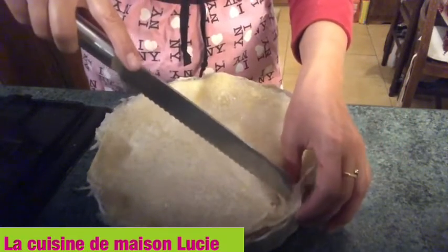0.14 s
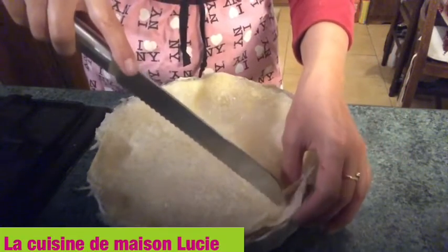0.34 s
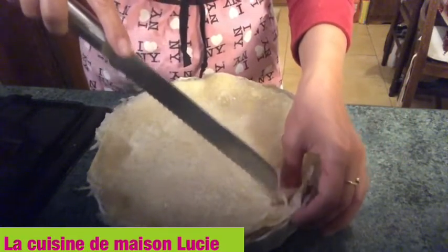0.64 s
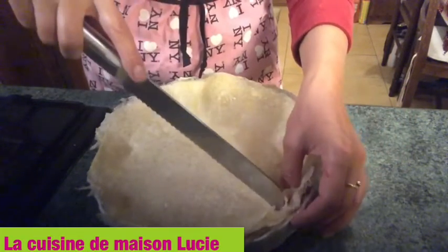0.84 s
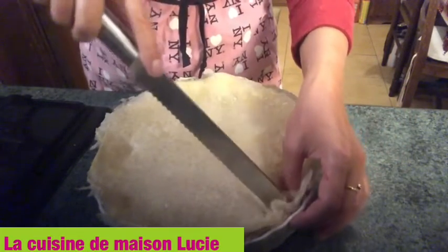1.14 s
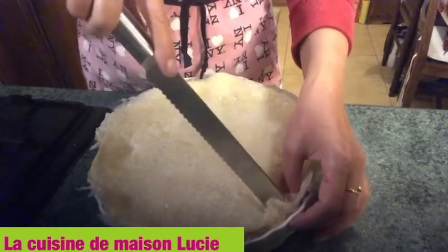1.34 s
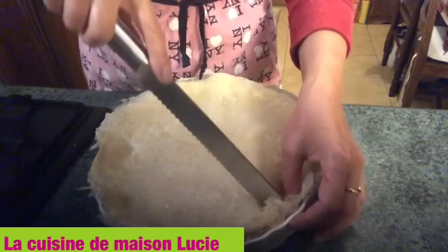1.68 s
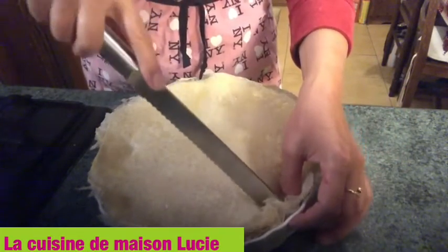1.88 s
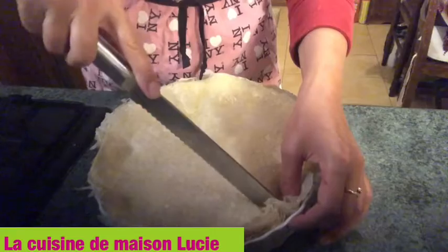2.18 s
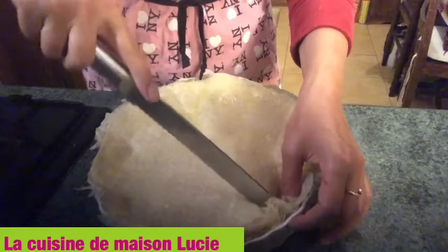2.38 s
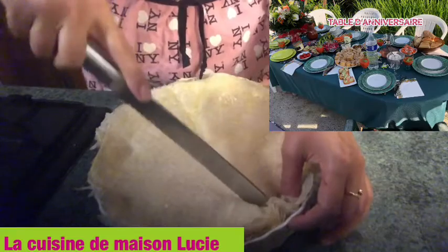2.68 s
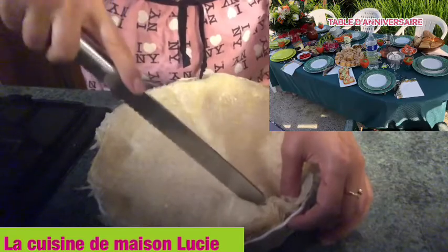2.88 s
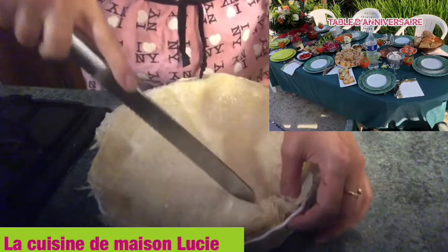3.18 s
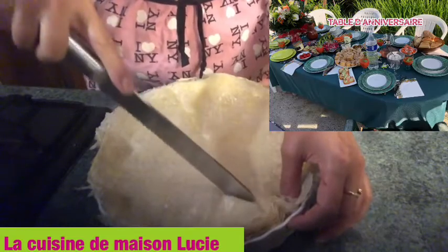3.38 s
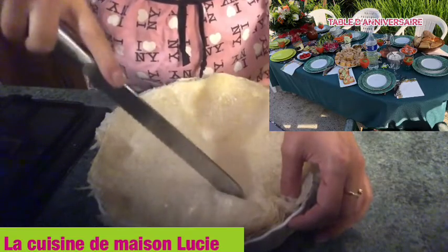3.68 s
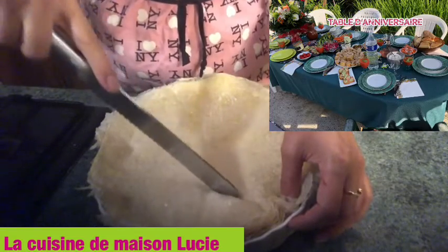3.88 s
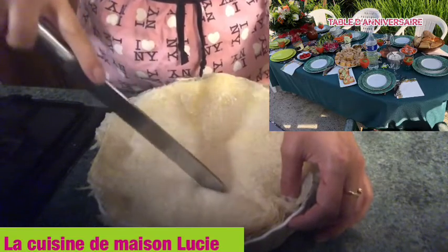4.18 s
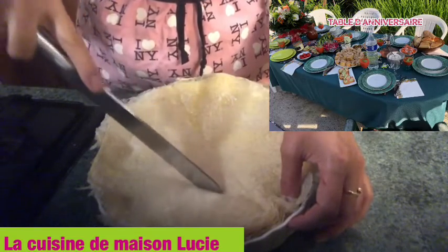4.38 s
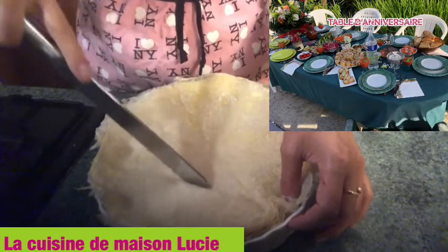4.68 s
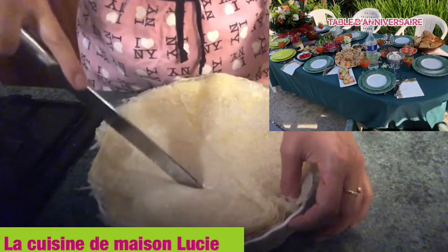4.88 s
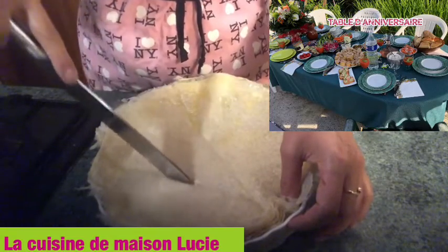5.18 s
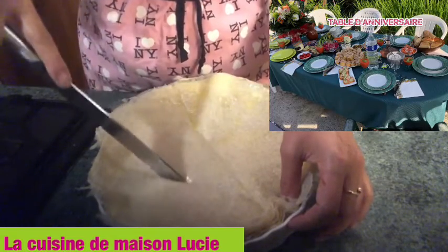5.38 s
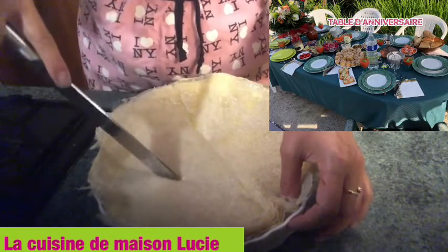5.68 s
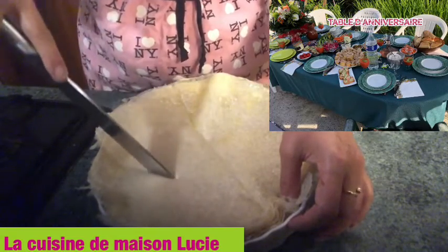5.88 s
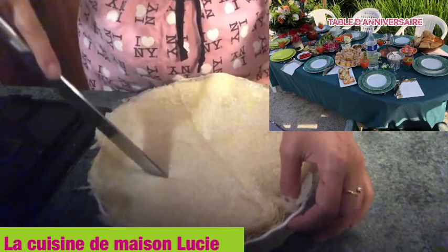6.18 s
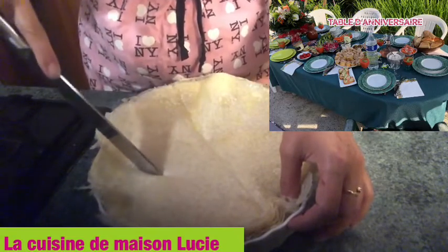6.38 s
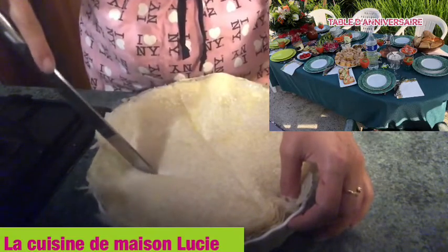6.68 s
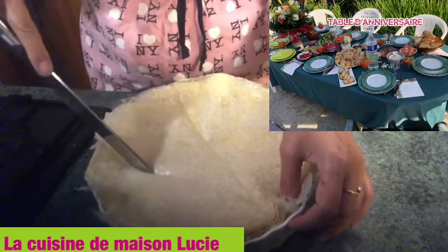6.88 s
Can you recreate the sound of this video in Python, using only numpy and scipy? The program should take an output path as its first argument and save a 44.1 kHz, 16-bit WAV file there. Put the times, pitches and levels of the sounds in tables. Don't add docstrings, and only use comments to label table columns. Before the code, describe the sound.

Close to a small microphone in a hard-walled kitchen, a blade tip works steadily through flaky pastry on a metal tray. Hum and hiss come first, alone; then crisp rustles, tiny flake snaps, wooden-sounding thuds and short ringing clacks repeat in a regular rhythm. The pace loosens after five seconds, with muffled hand bumps filling the gaps before three final, brighter jabs. The room echo is short.

```python
import sys
import numpy as np
from scipy import signal
from scipy.fft import rfft, irfft
from scipy.io import wavfile
from scipy.ndimage import uniform_filter1d

SR = 44100
rng = np.random.default_rng(int(sys.argv[2]) if len(sys.argv) > 2 else 0)


def waveform_to_disk(signal):
    frames = np.transpose(np.atleast_2d(signal))
    scaled = np.clip(frames, -1, 1) * 32767
    samples = np.round(scaled).astype(np.int16)
    wavfile.write(sys.argv[1], SR, samples)


def gain_from_db(level_db):
    decades = np.asarray(level_db, float) / 20
    return 10 ** decades


N = 310464


def along(table, hz):
    points_hz, values = np.array(table).T
    return np.interp(np.log(np.maximum(hz, 1)), np.log(points_hz), values)


def colour(x, table):
    gain = gain_from_db(along(table, np.fft.rfftfreq(len(x), 1 / SR)))
    y = irfft(rfft(x) * gain, len(x))
    return y / np.std(y)


def walk(rate_hz):
    hold = int(SR / rate_hz)
    steps = rng.standard_normal(N // hold + 1)
    return uniform_filter1d(np.repeat(steps, hold), hold)[:N]


def add(out, s, piece):
    i = int(s * SR)
    out[i:i + len(piece)] += piece[:len(out) - i]


def ring(t, hz, rise_s, t60, phase):
    t = np.maximum(t, 0)
    envelope = (1 - np.exp(-t / rise_s)) * np.exp(-np.log(1000) * t / t60)
    return envelope * np.sin(2 * np.pi * hz * t + phase)


def pulse(t, scale_s, peak_s):
    return t / scale_s * np.exp(1 - t / peak_s)


# f/Hz, level/dB
HUM_LINES = [(102.3, -71), (145.3, -77), (247.6, -74), (296.1, -81), (344.5, -74), (436, -88.5),
             (592.2, -88.5), (640.6, -89)]
# f/Hz, level/dB per Hz
AIR_SPECTRUM = [(15, -47), (32, -21), (48, -9), (64, -7.5), (92, -11.5), (195, -8.5), (249, -3.5),
                (293, -11.5), (344, -7), (394, -15.5), (476, -15), (1040, -20), (2160, -25.5), (3080, -26),
                (14800, -34.5), (16000, -38)]
AIR_DB = -63
EASE_S, HISS_EASE_DB, MIDDLE_EASE_DB = 0.92, -2.5, -0.5


def kitchen():
    t = np.arange(N) / SR
    hum = 0
    for hz, db in HUM_LINES:
        level = gain_from_db(db + 4.0 + 0.73 * walk(1.4))
        wander = 0.81 * np.cumsum(walk(4)) * 12 / SR
        hum = hum + level * np.sin(2 * np.pi * hz * t + wander)
    air = gain_from_db(AIR_DB - 5.0 + 0.417 * walk(2.9)) * colour(rng.standard_normal(N), AIR_SPECTRUM)
    hiss = signal.sosfilt(signal.butter(6, 8200, "high", fs=SR, output="sos"), air[::-1])
    dull = signal.sosfilt(signal.butter(6, 8200, fs=SR, output="sos"), air)
    middle = signal.sosfilt(signal.butter(2, 450, "high", fs=SR, output="sos"), dull)
    early = t < EASE_S
    middle_change = middle * np.where(early, 0, gain_from_db(MIDDLE_EASE_DB) - 1)
    return hum + dull + middle_change + hiss * np.where(early, 1, gain_from_db(HISS_EASE_DB))


# f/Hz, T60/s
ROOM_DECAY = [(80, 0.61), (200, 0.16), (600, 0.36), (1500, 0.19), (4000, 0.043), (10000, 0.06)]


def room(x, first_s=0.0054):
    t, tail = np.arange(int(0.6 * SR)) / SR, 0
    for hz in 60 * 2 ** np.arange(0, 8, 0.5):
        band = signal.butter(2, [hz / 2 ** 0.25, hz * 2 ** 0.25], "band", fs=SR, output="sos")
        echoes = signal.sosfilt(band, rng.standard_normal(len(t)))
        tail = tail + echoes * np.exp(-np.log(1000) * t / along(ROOM_DECAY, hz))
    tail = tail * np.clip(t / first_s, 0, 1) ** 2
    return signal.fftconvolve(x, tail / np.sqrt(np.sum(tail ** 2)))[:N]


# t/s, length/s, level/dB, f/Hz
HAND_BUMPS = [
    (5.295, 0.039, -56.5, 175),
    (5.86, 0.0085, -57.5, 230),
    (1.195, 0.04, -63, 285),
    (6.056, 0.018, -57, 161),
    (6.093, 0.02, -57, 177),
    (6.319, 0.041, -59, 242),
]


def hand_bumps():
    length = int(0.3 * SR)
    out, t = np.zeros(N), np.arange(length) / SR
    for s, length_s, db, hz in HAND_BUMPS:
        muffled = [(hz / 2.5, -20), (hz, 0), (hz * 1.5, -6), (600, -28), (2000, -45), (8000, -70)]
        dull = colour(rng.standard_normal(length), muffled)
        envelope = np.clip(t / 0.0047, 0, 1) * np.exp(-np.maximum(t - length_s, 0) / 0.013)
        add(out, s, gain_from_db(db) * dull * envelope)
    return out


def rubbing(moves, quick=1):
    rise_db_s, fall_db_s = 331 * quick, 434 * quick
    t, dull, crisp = np.arange(N // 32 + 1) * 32 / SR, 1e-14, 1e-14
    for s, hold_s, db, bright_db in moves:
        before, after = np.maximum(s - t, 0), np.maximum(t - s - hold_s, 0)
        power = gain_from_db(db - rise_db_s * before - fall_db_s * after) ** 2
        dull = dull + power
        crisp = crisp + power * gain_from_db(bright_db) ** 2
    return [np.interp(np.arange(N) / SR, t, np.sqrt(p)) for p in (dull, crisp)]


# t/s, hold/s, level/dB, f/Hz
BLADE_SONGS = [(0.922, 0.016, -77, 3140), (1.16, 0.067, -82, 3120), (1.225, 0.066, -81, 2330),
               (1.27, 0.06, -86, 2200), (1.244, 0.046, -81, 1900), (3.93, .015, -82, 14800),
               (3.6, 0.041, -86, 15000), (3.698, .006, -80, 14400), (5.1, 0.024, -69, 2280),
               (2.51, 0.06, -73, 2850), (3.425, 0.045, -73, 2930), (4.5, 0.017, -77, 5900),
               (6.4, .03, -84, 10800), (4.655, .025, -82, 12000), (4.51, .015, -87, 14000),
               (5.9, 0.014, -72, 2200), (5.724, 0.059, -88.5, 3200), (6.194, 0.024, -82, 2960)]
DRAG_QUICK = 2.2


def singing(cracks):
    out, width = 0, 0.055
    for s, hold_s, db, hz in BLADE_SONGS:
        peak = [(hz * (1 - 3 * width), -30), (hz * (1 - width), -6), (hz, 0),
                (hz * (1 + width), -6), (hz * (1 + 3 * width), -30)]
        loudness, _ = rubbing([(s, hold_s, db, 0)], DRAG_QUICK)
        out = out + loudness * colour(cracks, peak)
    return out


# t/s, level/dB, f/Hz
FLAKE_TICKS = [(1.333, -48, 2070), (1.338, -46, 800), (1.399, -49, 2740), (1.647, -54, 2500),
               (1.897, -53, 2660), (1.912, -51, 3060), (1.916, -60, 1000), (2.008, -46, 3000),
               (2.326, -44, 3000), (2.575, -53, 2300), (2.642, -49, 4400), (2.979, -43, 3430),
               (3.102, -45, 3070), (3.449, -52, 3600), (3.633, -52, 3800), (3.655, -51, 2500),
               (3.699, -63, 2220), (3.885, -49, 3150), (3.93, -41, 2740), (3.989, -37, 1510),
               (4.153, -45, 3080), (4.51, -39.5, 1370), (4.525, -61, 2160), (4.684, -55, 6530),
               (4.695, -45, 1190), (4.801, -57, 7000), (5.05, -40, 1400), (5.56, -30, 1340),
               (5.79, -58, 2990), (5.989, -52, 3180), (6.014, -48, 1710), (6.082, -42, 680),
               (6.493, -53, 4300), (6.494, -59, 2600), (6.542, -52, 4370), (6.771, -50.5, 4500)]


def flakes():
    out, t = np.zeros(N), np.arange(int(0.018 * SR)) / SR
    for s, db, hz in FLAKE_TICKS:
        spectrum = [(300, -20), (hz / 1.4, -8), (hz, 0), (hz * 1.4, -12), (7500, -24), (10000, -40)]
        snap = colour(rng.standard_normal(len(t)), spectrum)
        add(out, s, gain_from_db(db - 12.5) * snap * pulse(t, 0.0011, 0.0011))
    return out


# f/Hz, level/dB per Hz
DULL_SHEETS = [(400, -22.5), (900, 5), (1500, -0.5), (2250, 0.5), (2700, -2), (3200, -0.5), (3900, -6.5),
               (5500, -7), (7200, -11.5), (7900, -5.5), (8500, -39)]
CRISP_SHEETS = [(8000, -33), (9300, 2), (10200, -7), (11150, 1), (12500, -19), (14800, -2), (16000, -15)]
# t/s, level/dB, brightness/dB
BLADE_SINKS = [(1.675, -67.5, -15), (1.988, -71, -13), (2.322, -66, -12), (2.635, -72, -16),
               (2.9, -72, -19), (3.168, -70.5, -10), (3.445, -70, -16), (3.72, -69, -14), (3.98, -67, -9.5),
               (4.25, -68, -11), (4.505, -69.5, -9), (4.78, -69, -14), (5.023, -72.5, -4),
               (5.532, -71.5, -7), (6.325, -71.5, -9), (6.595, -71.5, -12), (6.815, -68, -19)]
# t/s, hold/s, level/dB, brightness/dB
BLADE_DRAGS = [(1.239, 0.14, -77, -27), (1.39, .015, -73, -11), (1.484, 0.12, -75.5, -22),
               (1.887, 0.02, -73, -12), (2.213, 0.04, -66.5, -23), (2.5, 0.062, -69.5, -18),
               (2.814, .012, -71.5, -15), (3.076, 0.042, -69.5, -13), (3.373, 0.033, -74, -14),
               (3.624, 0.017, -68.5, -16), (3.703, .006, -70, -11), (3.883, 0.012, -63, -20),
               (4.154, 0.018, -68, -18), (4.414, .015, -65, -18), (4.681, .008, -66.5, -13),
               (4.936, 0.038, -68.5, -16), (5.216, 0.019, -64.5, -15), (5.263, 0.064, -72.5, -19),
               (5.441, 0.025, -67.5, -15), (5.78, 0.015, -68.5, -12), (5.969, 0.033, -66.5, -16),
               (6.074, 0.017, -66.5, -8.5), (6.24, 0.048, -73, -12), (6.538, 0.0072, -67, -14),
               (6.76, .02, -72, -12), (6.914, .02, -66, -14.5)]


def pastry():
    sinks = [(s, jab[0] - s, db, bright_db) for (s, db, bright_db), jab in zip(BLADE_SINKS, TIP_JABS)]
    settle = [(jab[0], 0.13, -79.5, -26) for jab in TIP_JABS]
    sink_dull, sink_crisp = rubbing(sinks + settle)
    drag_dull, drag_crisp = rubbing(BLADE_DRAGS, DRAG_QUICK)
    dull, crisp = np.hypot(sink_dull, drag_dull), np.hypot(sink_crisp, drag_crisp)
    cracks = (rng.random(N) < 6000 / SR) * gain_from_db(1.4 * rng.exponential(size=N)) * rng.standard_normal(N)
    sharp_cracks = cracks[::-1] * (1 + abs(cracks[::-1]))
    sheets = dull * colour(cracks, DULL_SHEETS) + crisp * colour(sharp_cracks, CRISP_SHEETS)
    patchy_db = 2.5 * walk(50)
    return gain_from_db(patchy_db) * sheets + singing(cracks) + flakes()


def thud(hz, scrape_db, grit, glide, rise_s, edge, glide_s=0.0033, back_db=-9, deep_db=-12, blunt=1, sag=0):
    t = np.arange(len(grit)) / SR
    early_glide = glide * glide_s * (1 - np.exp(-t / glide_s))
    slow_sag = sag * 0.009 * (1 - np.exp(-t / 0.0064))
    turns = hz * (t + early_glide + slow_sag)
    swell = pulse(t, rise_s, rise_s) ** blunt
    swell = swell + edge * (1 - np.exp(-t / 0.00032)) * np.exp(-t / 0.0035)
    echo = ring(t - 0.0214, 0.85 * hz, 0.0011, 0.14, 0)
    boom = ring(t - 0.008, 92.9, 0.025, 0.32, 0) + 0.045 * ring(t - 0.012, 52, 0.0178, 0.68, 0)
    scrape = colour(grit, [(200, -20.5), (400, 0.0), (650, 8.0), (1000, -3.5), (1500, -24.5),
                           (3000, -56), (8000, -81)])
    scrape = scrape * (1 - np.exp(-t / 0.00043)) * np.exp(-t / 0.017)
    rumble = colour(grit[::-1], [(60, -22.0), (130, 2.0), (300, 6.5), (700, -17.5), (1500, -59.0),
                                 (8000, -75.5)])
    rumble = rumble * pulse(t, 0.019, 0.015)
    wave = swell * np.sin(2 * np.pi * turns)
    return wave + gain_from_db(back_db) * echo + gain_from_db(deep_db) * boom + gain_from_db(scrape_db) * scrape + gain_from_db(-17.5) * rumble


# t/s, level/dB, f/Hz, scrape level/dB
CRUST_PUSHES = [(1.284, -42.5, 161, -29), (1.394, -48, 172, -30), (1.671, -32.5, 158, -23),
                (1.994, -34, 157, -18), (2.305, -34, 162, -22), (2.618, -33.5, 156, -18.5),
                (2.897, -33, 154, -20.5), (3.175, -34.5, 156.4, -21), (3.444, -33.5, 171, -22),
                (3.719, -35.5, 155, -14), (3.981, -34.5, 162, -19), (4.258, -34.5, 160, -19),
                (4.522, -39, 145, -10), (4.77, -46, 136, -12), (5.042, -42, 186, -15)]
# t/s, level/dB, f/Hz, scrape level/dB
BLADE_PULLS = [(1.504, -40, 134.7, -29), (1.845, -40, 135.4, -17), (2.179, -40.5, 134, -22),
               (2.491, -39.5, 137, -30), (2.779, -39.5, 134, -13.5), (3.039, -39.5, 141.4, -12.5),
               (3.318, -39.5, 139.4, -26), (3.572, -39.5, 137, -15), (3.811, -41, 140, -12),
               (4.082, -44.5, 135.6, -23), (4.341, -44.5, 128.6, -8), (4.583, -40.5, 136.5, -27)]


def worktop():
    out, length = np.zeros(N), int(0.3 * SR)
    for s, db, hz, scrape_db in CRUST_PUSHES:
        push = thud(hz, scrape_db, rng.standard_normal(length), glide=1.53, rise_s=0.0071, edge=0.046,
                    blunt=2.2)
        add(out, s - 0.0015, gain_from_db(db - 2.0) * push)
    for s, db, hz, scrape_db in BLADE_PULLS:
        pull = thud(hz, scrape_db - 0.5, rng.standard_normal(length), glide=5.02, rise_s=0.0105, edge=0.55,
                    sag=1.28, glide_s=0.00239, back_db=-3)
        add(out, s - 0.0035, gain_from_db(db - 5.0) * pull)
    return out


def tray_ring(t, modes, gains_db):
    out, free_s = 0, 0.0055
    for (hz, _), db in zip(modes, gains_db):
        late = t - 0.077 / np.sqrt(hz) + 0.000648
        pressed = np.exp(-np.maximum(late - free_s, 0) / (0.0012 + 0.8 / hz))
        half_stilled = 1.21 / (1 + (hz / 1000) ** 2) ** 2
        detuned_hz = hz * (1 + 0.006 * rng.standard_normal())
        mode = ring(late, detuned_hz, 0.00075 * np.sqrt(2000 / hz), 1 / (hz / 110 + 3),
                    3 * rng.standard_normal())
        gain = gain_from_db(db - 4.5 + 1.5 * rng.standard_normal())
        out = out + gain * (pressed + half_stilled) * mode
    return out


def buzz(grit, modes_hz, gains):
    width, tilt_db = 0.013, 5
    hz, peaks = np.fft.rfftfreq(len(grit), 1 / SR), 0
    for f, gain in zip(modes_hz, gains):
        if f > 700:
            tilt = gain_from_db(tilt_db * np.log2(f / 2000)) / np.sqrt(f / 2000)
            peaks = peaks + gain * tilt / (1 + 1j * (hz - f) / (width * f))
    peaks = peaks / (1 + (hz / 8000) ** 4)
    return 5 * irfft(rfft(grit) * peaks, len(grit))


# f/Hz, level/dB per Hz
TRAY_RATTLE = [(700, -7), (1180, 10.5), (1480, 14), (1780, 6), (2200, 11.5), (2800, -6.5), (3450, 8),
               (4000, -11.5), (5300, -4.5), (5900, -10.5), (6600, -8.5), (8000, -28), (12000, -54)]
# f/Hz, level/dB per Hz
BODY_KNOCK = [(100, -3), (200, 1.5), (320, 8.5), (400, 6.5), (620, 11), (850, -1), (1100, -22.5),
              (2000, -58), (6000, -77)]


def crumbs_and_body(t, grit, bands, struck):
    (_, body_db), (_, tray_db), (_, ring_db), (_, top_db) = bands[1:]
    crushed = colour(grit, [(4000, -37), (7000, 3.5), (9000, -1.0), (15000, -13.0)])
    crushed = crushed * pulse(t, 0.0028, 0.0037)
    shape = [(hz, db + 0.18 * along(bands, hz)) for hz, db in TRAY_RATTLE]
    rattle = (np.exp(-t / 0.0068) + 0.1 * np.exp(-t / 0.065)) * colour(grit, shape)
    knock = (np.exp(-t / 0.022) + 0.35 * np.exp(-t / 0.048)) * colour(grit, BODY_KNOCK)
    modes_hz, struck_db = struck
    signs = (-1.0) ** np.arange(len(modes_hz))
    shaking = np.exp(-t / 0.026) * buzz(grit[::-1], modes_hz, gain_from_db(struck_db - 30.5) * signs)
    swell = 1 - np.exp(-(t / 0.0055) ** 2)
    loose = gain_from_db((tray_db + ring_db) / 2 - 1.5) * rattle + gain_from_db(body_db - 5.0) * knock
    return gain_from_db(top_db - 35.0) * crushed + swell * (shaking + loose)


BLADE_MODES_HZ = [268, 320, 484, 588, 640, 785, 938, 1405, 1495, 1878, 2050, 2185, 2400, 3350, 3480, 4100,
                  4505, 4720, 4850, 5300, 6540, 6870, 7790, 410, 715, 1590, 2260]
# level/dB at rim, inner, halfway, middle
BLADE_LEVELS = [(-11, -15, -16, -32), (-14, -18.5, -12.5, -18), (-14.5, -22, -20, -23),
                (-11.5, -11, -18.5, -10), (-11.5, -14, -16, -20), (-27, -21, -33, -22),
                (-60, -27, -14, -28), (-29, -26.5, -17.5, -20), (-34, -35.5, -36, -29),
                (-25, -21, -19, -42), (-37, -24, -28.5, -28), (-22, -23.5, -31.5, -20),
                (-32, -34, -18.5, -22.5), (-29, -44, -41.5, -44), (-31, -32, -34, -48),
                (-38, -32.5, -48, -40), (-34, -40, -45, -35), (-43, -41, -43, -34), (-44, -37, -48.5, -44),
                (-38, -35, -45, -44), (-44, -51, -37, -27), (-40, -37, -38, -32), (-54, -50, -52, -54),
                (-22, -26, -29, -17), (-15, -15.5, -29.5, -27), (-48, -43, -45, -26), (-42, -39, -30, -15)]
# f/Hz, T60/s
BLADE_DECAY = [(300, 0.17), (650, 0.22), (1500, .3), (3500, 0.31), (7000, 0.15)]


def blade_ring(t, grit, bands, place):
    rub = uniform_filter1d(uniform_filter1d(grit, size=300, mode="wrap"), size=200, mode="wrap")
    rub = rub / np.std(rub)
    chatter, wander_rad = 1 + 0.7 * rub, 0.45 * rub[::-1]
    out, low_db = 0, bands[0][1]
    for k, (hz, levels) in enumerate(zip(BLADE_MODES_HZ, BLADE_LEVELS)):
        tilt_db = 0.36 * (along(bands, hz) - low_db)
        gain = gain_from_db(levels[place] + low_db + tilt_db + 1.5 * rng.standard_normal())
        detuned_hz = hz * (1 + 0.0023 * rng.standard_normal())
        phase = 3 * rng.standard_normal() + np.roll(wander_rad, 700 * k + 250)
        mode = ring(t, detuned_hz, 0.0016, along(BLADE_DECAY, hz), phase)
        out = out + gain * np.roll(chatter, 500 * k) * mode
    return out


# tip sharpness/dB, worktop body/dB, blade ring/dB
TIP_JABS = [(1.6929, -40.5, 1, 6, 6), (2.024, -31, 3.5, 0, 3.5), (2.3484, -26.5, 7, -0.5, 4),
            (2.6654, -33, -1, -4, -1), (2.92, -32.5, 6.5, -2, 6), (3.2073, -32.5, -3, -2, 6.5),
            (3.467, -30.5, 1, -3.5, 3.5), (3.7257, -32, 1.5, -1.5, 6), (3.995, -36.5, 5, 0, 13.5),
            (4.2726, -33.5, 5, -4, 10), (4.5362, -36, 3, -3, 10.5), (4.8083, -37, -2, -5.5, 11.5),
            (5.055, -30.5, 2.5, -6, 2), (5.564, -29, 4.5, -5, -0.5), (6.348, -34, -3.5, -2, -2),
            (6.62, -36.5, -5, -0.5, -7.5), (6.8365, -30, -2.5, -1.5, -7)]
JAB_BANDS_HZ = [200, 650, 1550, 2350, 3700]
# f/Hz, level/dB
RIM_MODES = [(270, -4.5), (320, -3.5), (430, 0.5), (515, 2), (640, -0.5), (770, -6), (935, 0), (1150, -5.5),
             (1450, 10), (1600, 10.5), (1780, 10.5), (2240, 1.5), (2760, -3), (3480, 2.5), (4070, -11.5),
             (4520, -10), (5010, -5.5), (5310, -3), (5950, -15), (6560, -3), (7000, -17), (7800, -15),
             (10000, -19.5), (11200, -24), (13200, -25.5), (15000, -24)]
INNER_MODES = [(285, -6), (320, -4.5), (440, -3), (533, 1), (640, 2.5), (770, -14), (920, -2), (1100, 4),
               (1450, 6), (1545, 10), (1760, 8), (2240, 0.5), (2500, -10.5), (2790, -10), (3200, -2),
               (3450, 1.5), (3570, -7.5), (4120, -5.5), (4520, -8.5), (4960, -6), (5350, -8.5), (5950, -17),
               (6500, -7.5), (7000, -13.5), (7900, -12), (10000, -16), (11200, -26), (13200, -39),
               (15000, -32)]
HALFWAY_MODES = [(315, -8.5), (500, -12), (580, -6.5), (650, 2.5), (780, -36), (930, 6.5), (1010, -2.5),
                 (1420, -3), (1780, -11), (2190, -14), (2400, 12), (2800, -23.5), (3460, 2), (3800, -13.5),
                 (4170, -18), (4480, -6.5), (5350, -4.5), (5810, -10.5), (6570, -3.5), (7230, -14),
                 (9930, -17.5), (11100, -23), (14800, -48)]
MIDDLE_MODES = [(255, -2), (310, -2.5), (510, -7), (640, 1), (780, -2), (910, 10), (1180, -14.5),
                (1470, 3.5), (1800, -44), (2160, 10.5), (2380, 11.5), (2800, 7), (3190, 12.5), (3500, 2.5),
                (4100, 2.5), (4830, -2.5), (5210, -1.5), (6110, 0), (6670, -5), (7890, -7), (9990, -18),
                (11000, -17), (14800, -38)]
INNER_S, HALFWAY_S, MIDDLE_S = 3.1, 4.9, 6.0
# t/s, f/Hz, level/dB
MODE_ACCENTS = [(1.6931, 3480, -1.5), (2.024, 5010, -19), (2.3485, 515, 1), (2.3485, 770, -29),
                (2.3485, 1150, 8), (2.3485, 1600, -13), (2.921, 6560, -9.5), (3.2073, 3570, 14.5),
                (3.2073, 1760, -6.5), (3.7264, 3570, 3), (3.7264, 640, -1.5), (3.9954, 2500, -28),
                (4.2726, 3450, -0.5), (4.8086, 1545, -4), (2.921, 515, 4), (2.921, 1780, -9),
                (2.921, 2240, -13), (2.921, 5310, -14), (2.024, 430, -8), (2.024, 3480, 1),
                (2.3485, 1450, -3.5), (2.3485, 7800, 2), (3.467, 2240, 1.5), (3.467, 4960, -1),
                (3.467, 6500, -17), (3.7264, 4960, -10), (3.7264, 6500, -8), (3.9954, 285, 2),
                (3.9954, 920, -8), (3.9954, 6500, 5), (3.9954, 3450, 0), (4.2726, 4120, 1.5),
                (4.2726, 4960, 1), (4.5365, 2500, -4), (4.5365, 4520, -3), (4.8086, 1760, -28),
                (4.8086, 533, -15), (5.055, 650, 4.5), (5.055, 2190, 9), (5.055, 1420, 2.5),
                (5.055, 1780, -14), (5.055, 6570, -11), (5.564, 930, 4), (5.564, 1010, 1),
                (5.564, 2400, 6.5), (5.564, 1780, -3), (5.564, 2190, -10), (6.348, 780, 7),
                (6.348, 2380, -3.5), (6.348, 2800, -5), (6.348, 3190, -5), (6.62, 1470, -2.5),
                (6.62, 2380, -1), (6.62, 780, 5), (6.62, 3190, -4), (6.62, 3500, 1), (6.8363, 780, -18),
                (6.8363, 3190, 1), (6.8363, 6670, 3), (6.8363, 7890, 0.5)]
TRAY_FLOOR_DB = (-7, -6.5, 2.5, 8.5)
CUPBOARD_DB = (-32, -19, -21.5, -15.5)
WORKTOP_DB = (-1, -2, -1.5, -1.5)


def jabs():
    out, t = np.zeros(N), np.arange(int(0.3 * SR)) / SR
    for s, low_db, sharp_db, body_db, ring_db in TIP_JABS:
        grit = rng.standard_normal(len(t))
        place = (s > INNER_S) + (s > HALFWAY_S) + (s > MIDDLE_S)
        modes = np.array((RIM_MODES, INNER_MODES, HALFWAY_MODES, MIDDLE_MODES)[place], float)
        for at, near_hz, db in MODE_ACCENTS:
            if abs(at - s) < 0.01:
                modes[np.argmin(abs(modes[:, 0] - near_hz)), 1] += db
        tray_db = TRAY_FLOOR_DB[place] + 0.29 * body_db
        band_db = [low_db + db for db in (0, body_db, tray_db, ring_db, sharp_db)]
        bands = list(zip(JAB_BANDS_HZ, band_db))
        nearest = np.argmin(abs(np.log(modes[:, :1] / JAB_BANDS_HZ)), axis=1)
        struck_db = modes[:, 1] + np.array(band_db)[nearest]
        add(out, s, tray_ring(t[:len(t) // 3], modes, struck_db))
        add(out, s, crumbs_and_body(t, grit, bands, (modes[:, 0], struck_db)))
        add(out, s, blade_ring(t, grit, bands, place))
        blow = thud(162.3, -44, grit, glide=2.28, rise_s=0.0047, edge=0.067, deep_db=CUPBOARD_DB[place])
        add(out, s + 0.00034, gain_from_db(low_db + WORKTOP_DB[place]) * blow)
    return out


def scene():
    low, sheets, knife = worktop() + hand_bumps(), pastry(), jabs()
    wet = room(gain_from_db(-23.0) * knife + gain_from_db(-14) * low + gain_from_db(-19) * sheets)
    return (knife + low + sheets + wet + kitchen())[None]


def band_limit(x):
    return signal.sosfilt(signal.butter(12, 16600, fs=SR, output="sos"), x)


def record(dry):
    thin = signal.sosfilt(signal.butter(6, 40, "high", fs=SR, output="sos"), dry)
    mix = signal.sosfilt(signal.ellip(8, 0.5, 30, 15900, fs=SR, output="sos"), thin)
    return band_limit(mix)


dry = scene()
out = record(dry)
waveform_to_disk(out)
```